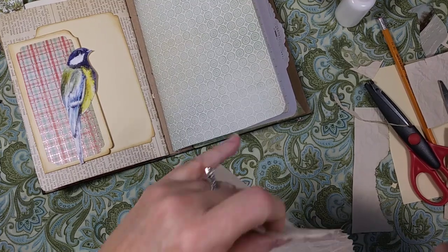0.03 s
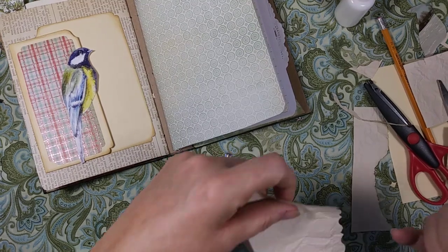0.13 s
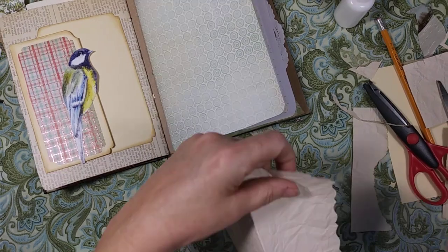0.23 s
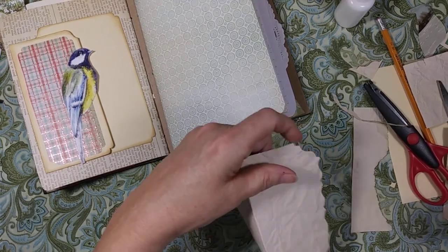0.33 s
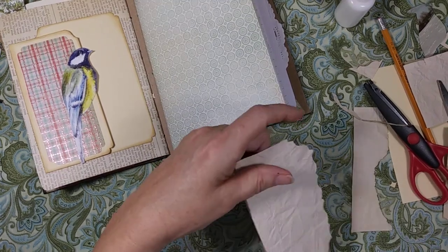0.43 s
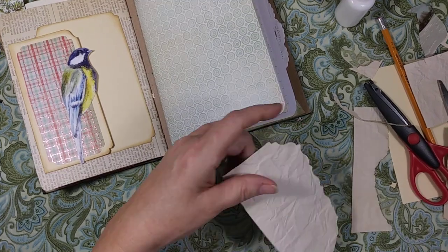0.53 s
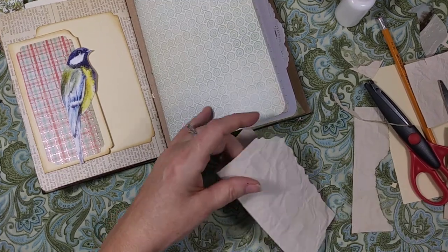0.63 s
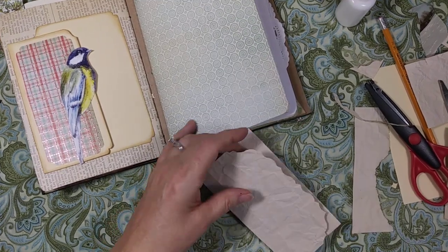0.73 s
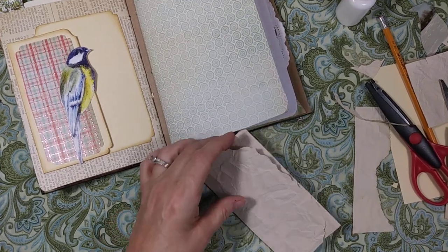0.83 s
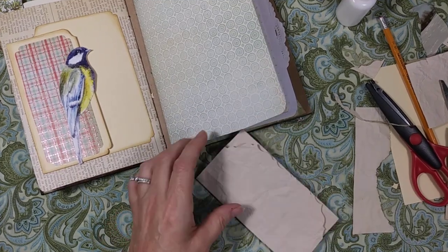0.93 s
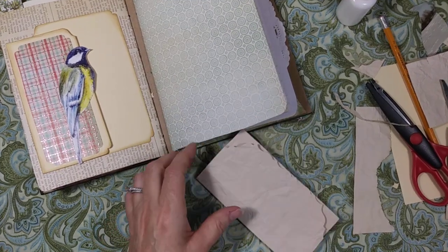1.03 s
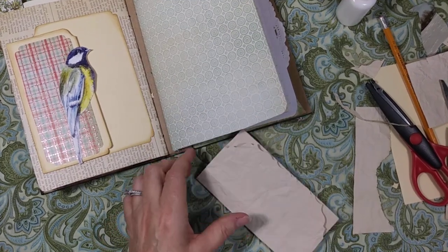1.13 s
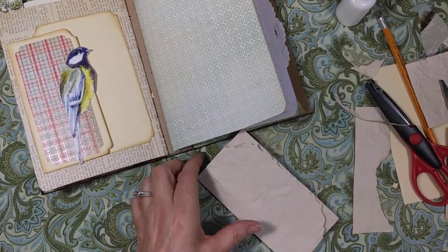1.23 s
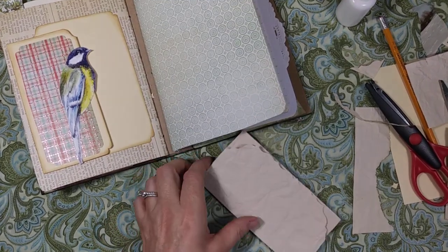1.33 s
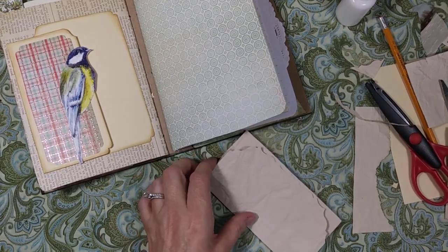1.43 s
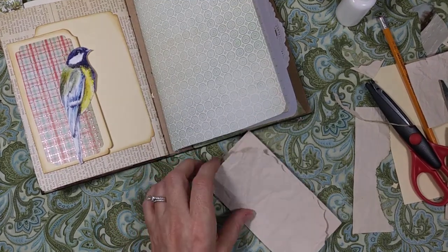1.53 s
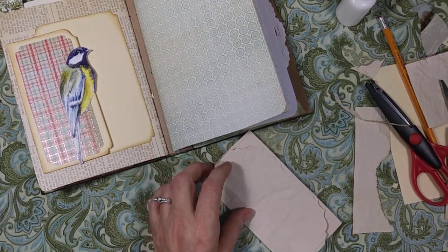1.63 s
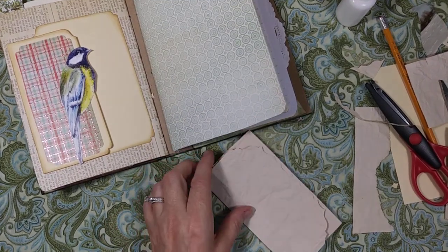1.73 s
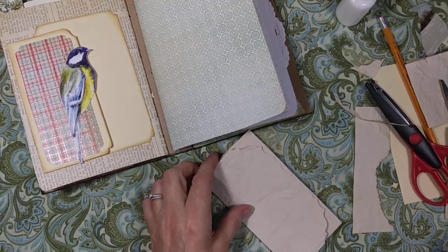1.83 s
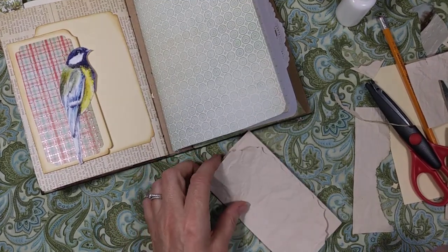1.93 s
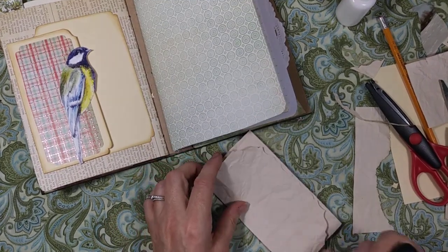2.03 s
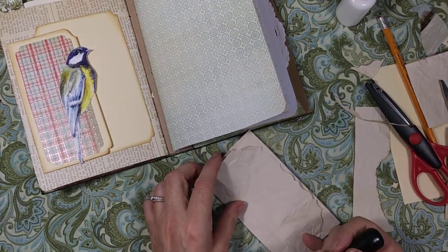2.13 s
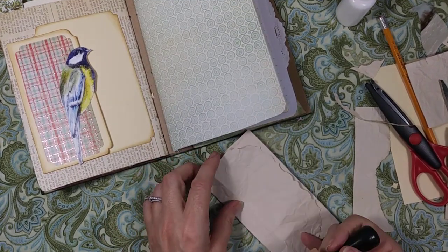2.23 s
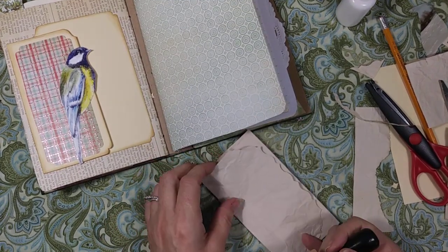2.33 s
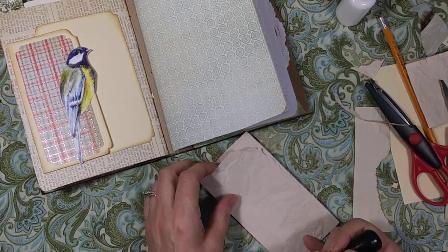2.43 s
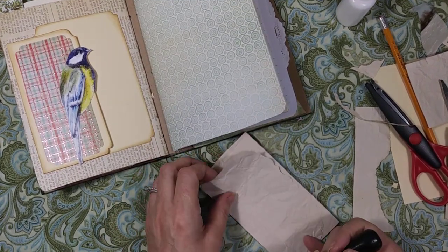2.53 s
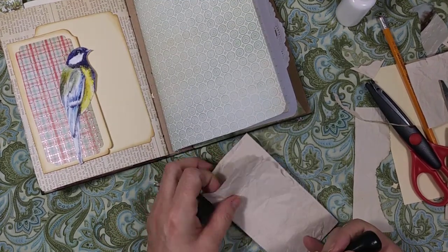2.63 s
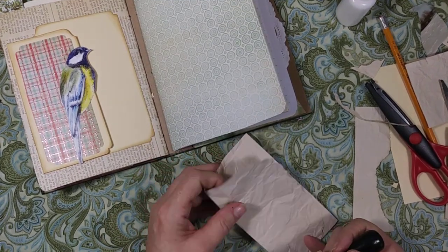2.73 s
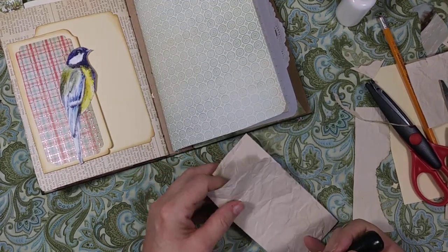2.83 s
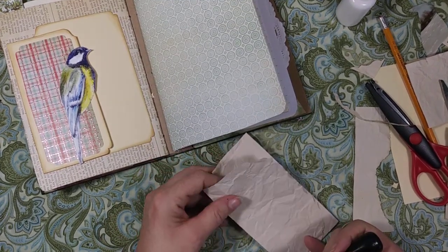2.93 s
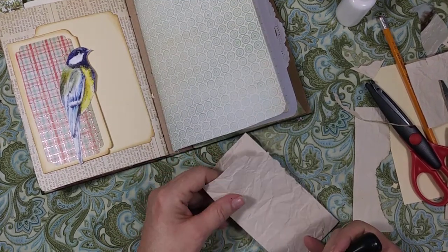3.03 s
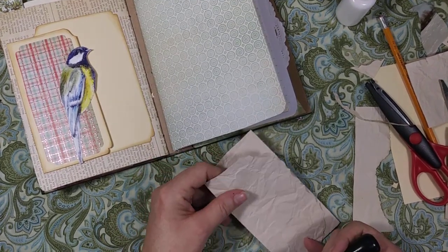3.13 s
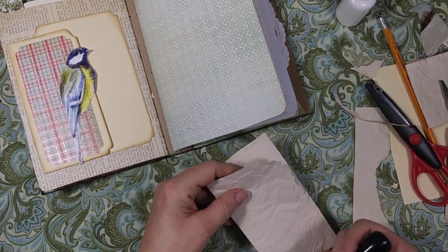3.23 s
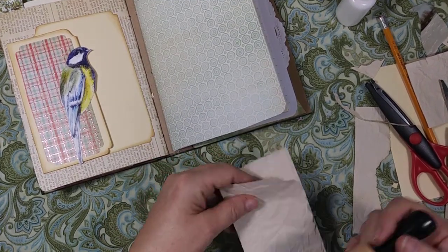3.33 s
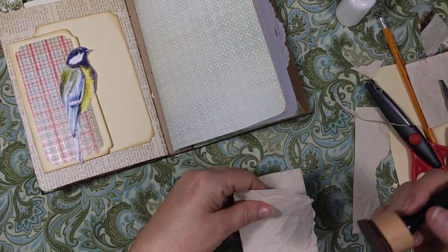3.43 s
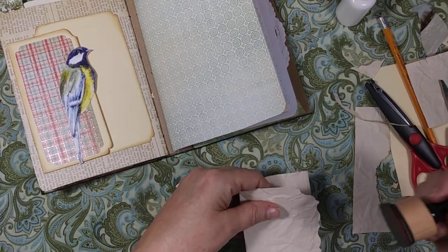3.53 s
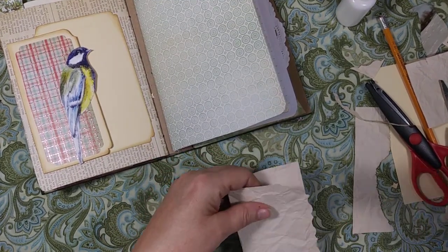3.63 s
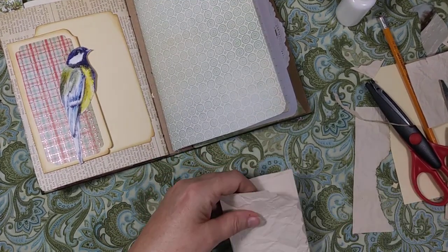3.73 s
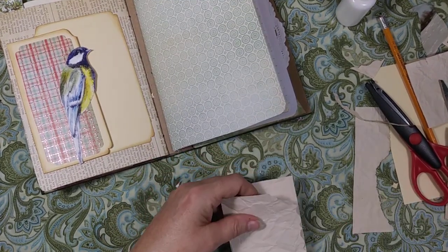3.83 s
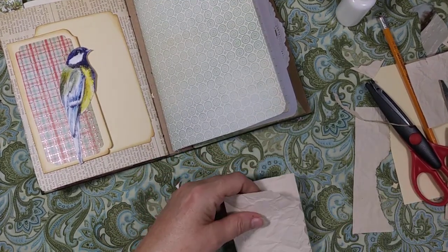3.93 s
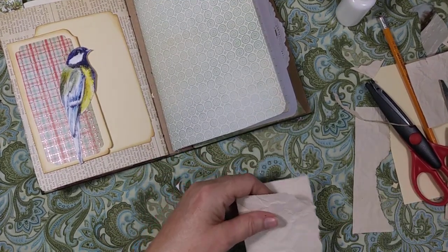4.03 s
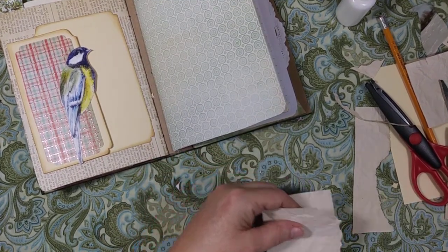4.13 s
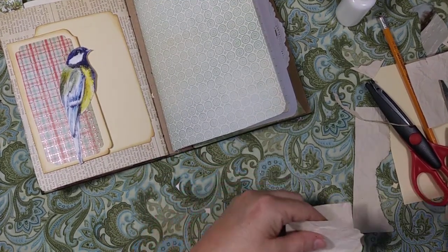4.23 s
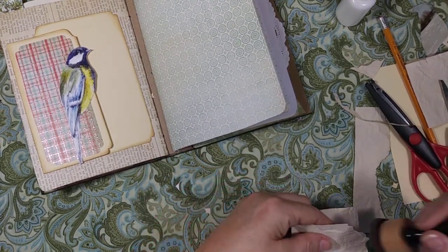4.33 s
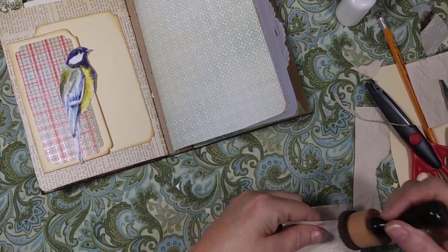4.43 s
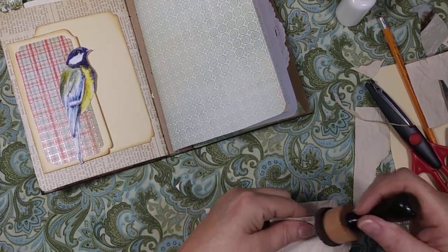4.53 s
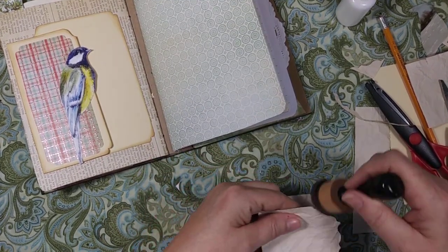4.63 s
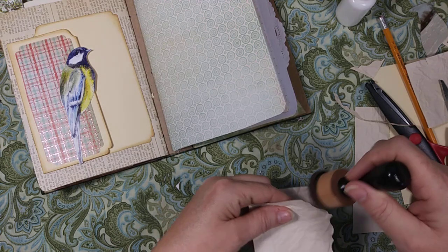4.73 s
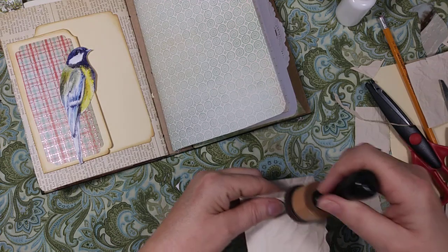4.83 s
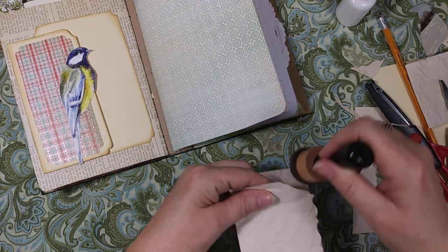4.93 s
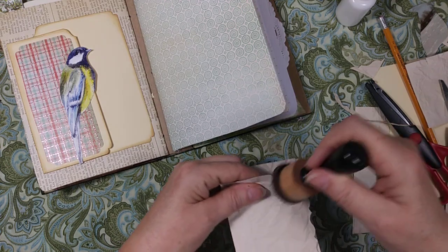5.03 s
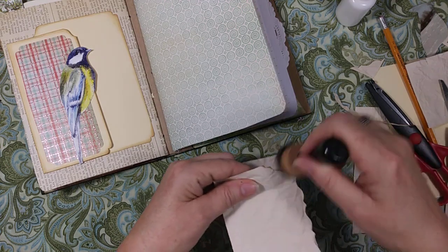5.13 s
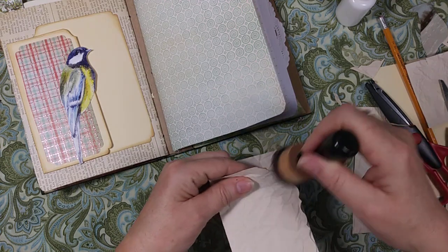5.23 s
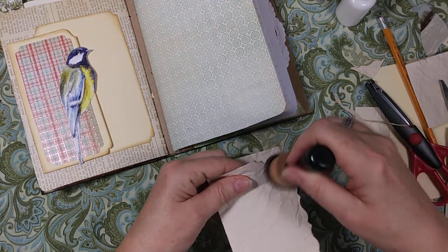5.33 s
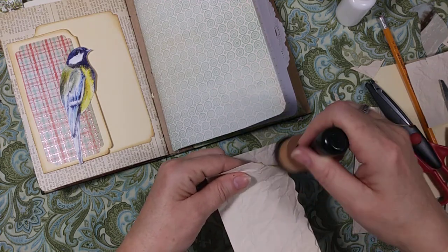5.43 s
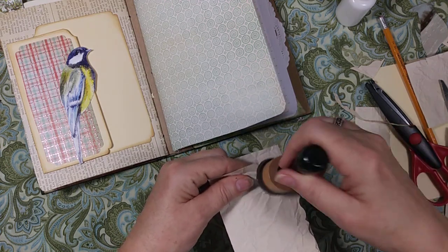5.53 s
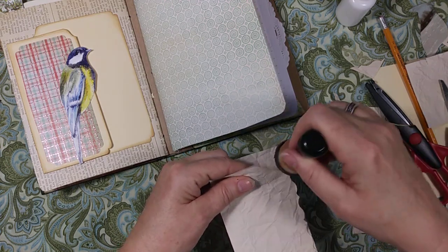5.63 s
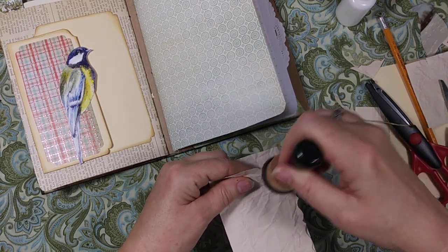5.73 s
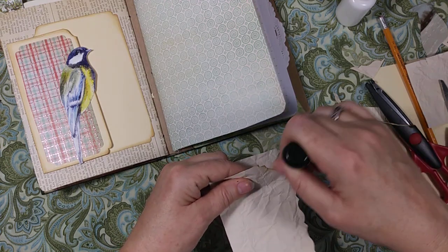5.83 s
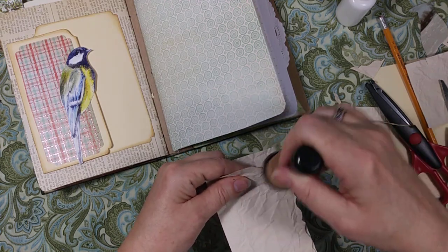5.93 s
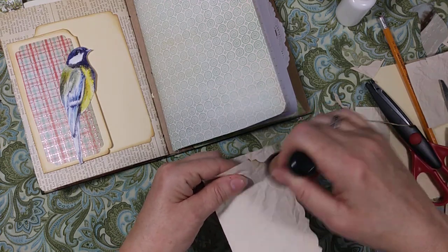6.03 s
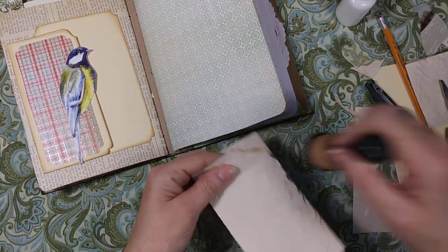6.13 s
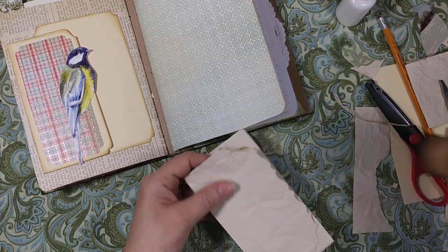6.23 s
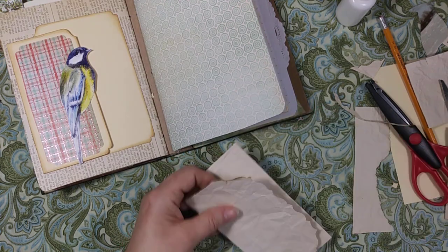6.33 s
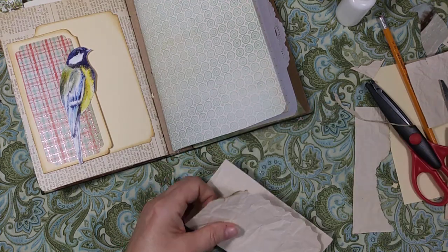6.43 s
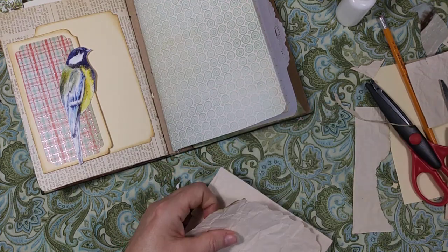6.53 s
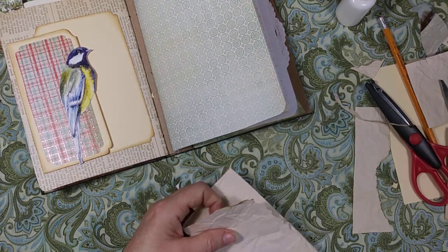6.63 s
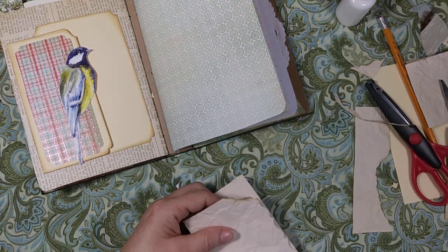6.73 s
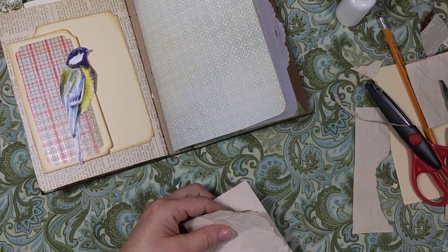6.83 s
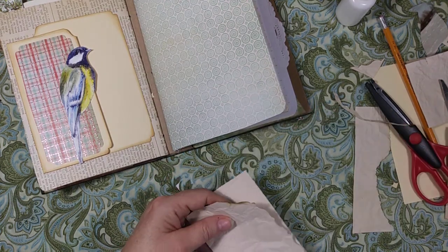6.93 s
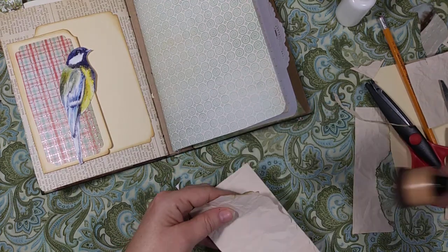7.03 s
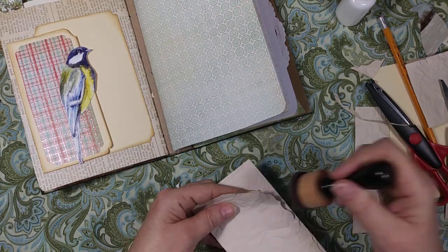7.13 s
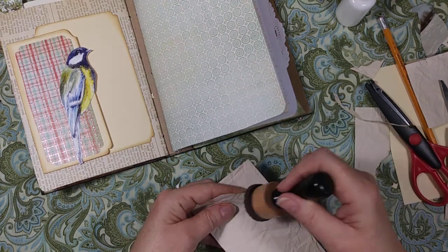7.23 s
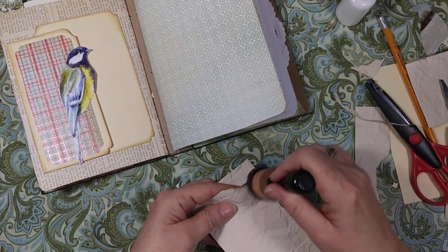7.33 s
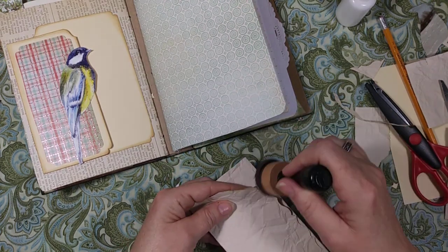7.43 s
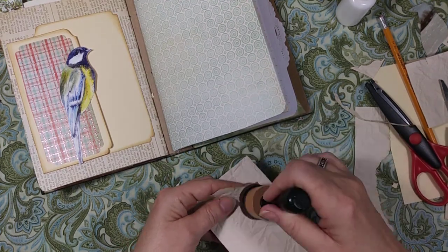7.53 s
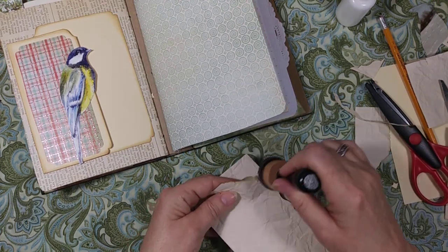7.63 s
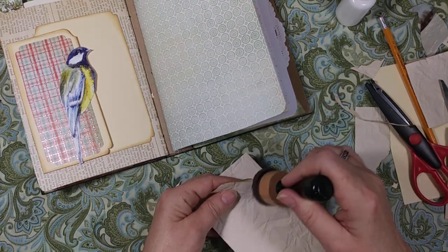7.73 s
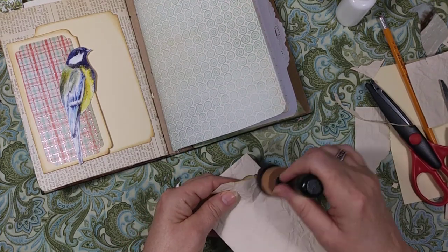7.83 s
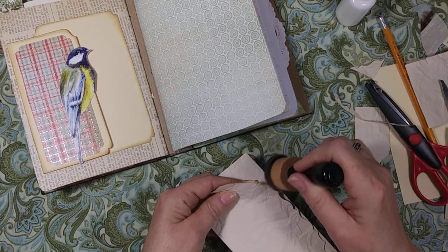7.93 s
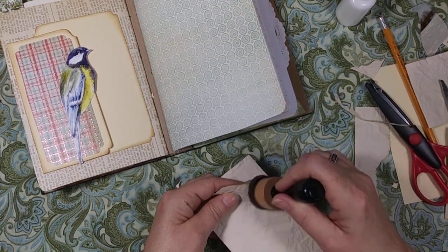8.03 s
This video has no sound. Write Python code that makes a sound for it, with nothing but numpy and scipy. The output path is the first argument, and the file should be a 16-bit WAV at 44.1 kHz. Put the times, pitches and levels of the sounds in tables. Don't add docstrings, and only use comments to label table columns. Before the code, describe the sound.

Crumpled paper rustles and crackles on a cloth-covered table, then a foam dauber scuffs its edge in short dry strokes ending in papery snaps.

```python
import sys
import numpy as np
from scipy import signal
from scipy.io import wavfile
from scipy.ndimage import uniform_filter1d

SR = 44100
rng = np.random.default_rng(int(sys.argv[2]) if len(sys.argv) > 2 else 0)


def store_wav(level_fs):
    pcm = np.round(np.clip(np.atleast_2d(level_fs), -1, 1) * 32767)
    wavfile.write(sys.argv[1], SR, pcm.T.astype(np.int16))


def volts(x):
    e = np.asarray(x, float) / 20
    return 10 ** e


N = 356769
STEP = 32

# [hz, level_db per Hz]
FIBRE_HISS = [(880, -44), (1500, -25), (2340, -16.5), (3600, 5.5), (5490, 1), (10000, -6), (11800, -24.5),
              (16000, -12)]
# [hz, width_hz, level_db]
SHEET_MODES = [(570, 130, -6), (737, 73, 1.5), (1123, 115, 5.5), (1350, 630, -7.5), (1730, 58, 5),
               (2380, 680, 0.5)]
# [hz, width_hz, level_db]
CRACK_MODES = [(2630, 280, -0.5), (3100, 120, -4), (3850, 88, -5.5), (4440, 500, -1.5), (5746, 300, 9.5),
               (5860, 330, 7.5), (6620, 430, 0)]
# [hz, width_hz, level_db]
HAND_MODES = [(300, 110, -2), (500, 110, 0), (710, 120, -6)]
HELD_SHEET_DB = -4.5
LOOSE_DULLS, SHEEN_HZ = 0.53, 6000


def rubbing():
    hiss_db, body_db, flap_hz, loose_db, dabbing = friction()
    fibres = grains(per_s=9500, spread_db=3.0, clump_db=2.32)
    crinkles = grains(per_s=210, spread_db=3.0, clump_db=2.5)
    catches = rms_one(fibres) + volts(-11.5) * rms_one(crinkles)

    hiss = coloured(catches, FIBRE_HISS, patchy_db=1.3, rate=18)
    crackle = modes(catches[1], CRACK_MODES, [drift(16) for mode in CRACK_MODES], scatter_db=4.5)
    hiss = hiss + volts(-7) * rms_one(crackle)
    soft = signal.lfilter(*signal.butter(1, SHEEN_HZ, fs=SR), hiss)
    hiss = soft + volts(-LOOSE_DULLS * np.maximum(loose_db, 0)) * (hiss - soft)
    hiss = dull(hiss, cut_hz=12700)

    sheet = modes(catches[0], SHEET_MODES, [drift(20.3) for mode in SHEET_MODES], scatter_db=4.5)
    body = rms_one(sheet) + 1.2 * rms_one(flap(catches[1], flap_hz, width_share=.2))
    boom = modes(catches[1], HAND_MODES[1:], [drift(16), drift(13)], scatter_db=3.5)
    body = body + volts(HELD_SHEET_DB) * dabbing * rms_one(boom)
    body = rms_one(dull(body, cut_hz=2950))
    return volts(hiss_db - 1.0) * (hiss + volts(np.minimum(body_db, 6) - 3.5) * body)


# [pressure_end_s, hiss_db, swell_s, held_s, fade_s]
DAUBER_STROKES = [
    (4.72, -43.5, 0.038, 0.033, 0.027),
    (4.989, -47, .04, .04, 0.041),
    (5.216, -45, 0.052, 0.022, 0.068),
    (5.456, -47, 0.047, 0.047, 0.059),
    (5.665, -49.5, 0.037, 0.037, .11),
    (5.915, -53.5, .025, 0.054, 0.081),
    (6.144, -53, 0.11, 0.022, 0.046),
    (7.433, -49, 0.043, 0.038, 0.044),
    (7.715, -47.5, 0.11, 0.046, 0.032),
    (7.93, -44.5, 0.057, 0.013, 0.054),
]
# [peak_s, hiss_db, swell_s, fade_s]
SHEET_SHIFTS = [(0.0, -50.5, .1, 0.24), (0.172, -46.5, 0.067, 0.087), (0.355, -43.5, 0.067, .13),
                (0.479, -53.5, 0.057, 0.45), (0.659, -55, 0.058, 0.39), (0.8, -52, .3, .06),
                (0.852, -40.5, .016, 0.023), (0.938, -50.5, 0.097, .17), (1.6, -52, 0.062, .05),
                (1.634, -37.5, 0.05, 0.025), (1.766, -51, 0.099, 0.082), (1.97, -53, 0.049, 0.037),
                (2.047, -56, 0.035, 0.13), (2.207, -47.5, 0.068, 0.086), (2.299, -44, 0.08, 0.031),
                (2.464, -43.5, .12, 0.024), (2.714, -44.5, 0.21, 0.047), (2.808, -44.5, 0.049, 0.21),
                (2.893, -45.5, 0.17, 0.029), (3.052, -50.5, .02, 0.64), (3.267, -42, 0.11, 0.08),
                (3.368, -53.5, 0.13, 0.42), (3.79, -51, .3, 0.22), (4.198, -51, 0.32, 0.26),
                (4.446, -53, 0.089, 0.13), (6.254, -42, 0.057, 0.065), (6.441, -49, .2, 0.33),
                (6.77, -46.5, 0.26, 0.26), (6.934, -45, 0.063, 0.19), (7.192, -52, .12, 0.096)]
# [time_s, hiss_db, flap_pitch_hz, looseness_db added to the body]
STEADY_CONTACT = [(0.0, -59, 1930, -0.2), (0.4, -66.5, 1300, 1.6), (0.7, -55.5, 2200, -0.8),
                  (1.0, -63, 1700, 0.5), (1.09, -75, 1300, -0.5), (1.36, -67, 1500, 0),
                  (1.45, -56, 2300, 0.5), (2.0, -72, 2300, 2), (2.4, -68, 2250, 3.5),
                  (2.95, -66.5, 1310, -1.1), (3.5, -58, 1460, -4), (3.95, -63, 2060, 2.5),
                  (4.5, -72, 1400, 0.2), (6.15, -70, 1290, -0.2), (6.45, -63.5, 2050, -2.5),
                  (6.8, -53.5, 1760, -1.5), (7.3, -64.5, 1570, -0.5), (8.09, -69.5, 1300, -1.5)]
# [from_s, to_s]
DABBING_SPANS = [
    (4.55, 6.2),
    (7.3, 8.1),
]
BODY_DB, DABBING_BODY_DB = 0.18, 4
BODY_LAGS, MID_RUB_DB = 0.28, -55


def friction():
    contact_db, flap_hz, loose_db = in_time(STEADY_CONTACT)
    power = sum(swell(s, db, swell_s, 0, fade_s) for s, db, swell_s, fade_s in SHEET_SHIFTS)
    power = power + sum(swell(*stroke) for stroke in DAUBER_STROKES)
    hiss_db = 10 * np.log10(volts(2 * contact_db) + smooth(power))
    t = np.arange(N) / SR
    dabbing = sum((t > start) & (t < end) for start, end in DABBING_SPANS)
    body_db = BODY_DB + loose_db + DABBING_BODY_DB * dabbing - BODY_LAGS * (hiss_db - MID_RUB_DB)
    return hiss_db, body_db, flap_hz, loose_db, dabbing


def swell(s, db, swell_s, held_s, fade_s):
    t = steps() - s
    before = np.maximum(-t - held_s, 0) / max(swell_s, .005)
    after = np.maximum(t, 0) / max(fade_s, .005)
    return volts(2 * (db - 20 * np.minimum(before + after, 4)))


def grains(per_s, spread_db, clump_db):
    sizes = volts(spread_db * np.minimum(rng.exponential(1, (2, N)), 5)) * rng.choice([-1, 1], (2, N))
    born = rng.random((2, N)) < per_s / SR
    return sizes * born * volts(clump_db * drift(28.4))


def flap(x, hz, width_share):
    out, state = np.zeros(N), np.zeros(2)
    for i in range(0, N, 256):
        r = np.exp(-np.pi * width_share * hz[i] / SR)
        poles = [1, -2 * r * np.cos(2 * np.pi * hz[i] / SR), r * r]
        out[i:i + 256], state = signal.lfilter([1 - r, 0, r - 1], poles, x[i:i + 256], zi=state)
    return out


# [hz, width_hz, level_db]
TABLE_MODES = [(420, 160, -14), (670, 70, 0)]
HAND_HZ, LIFTED_S, VOLLEY_T60_S = 500, 3.5, 0.031


def snaps():
    out, t = np.zeros(N + 2048), np.arange(2048) / SR
    for s, body_db, hz, crack_db, crack_hz, thud_db, thud_hz in snap_rows():
        luck = rng.standard_normal((5, len(t)))
        volley = luck[:2] ** 3 * [[.07], [.12]] * volts(-60 * t / VOLLEY_T60_S)
        volley[:, 0] += 4.0

        bend = dull(volley[0], cut_hz=1.12 * hz)
        body = resonance(bend, hz, 0.24 * hz)
        body = body + volts(-11.5) * modes(bend, SHEET_MODES, luck[2], scatter_db=2.0)

        tear = dull(dull(volley[1], cut_hz=22000), cut_hz=8000)
        crack = resonance(tear, crack_hz, 0.16 * crack_hz)
        crack = crack + volts(-10) * modes(tear, CRACK_MODES, luck[3], scatter_db=4.0)
        bare_edge = dull(np.diff(tear, prepend=0), cut_hz=9500)
        crack = crack + volts(-16.5) * bare_edge

        lying = s < LIFTED_S
        ratio = thud_hz / HAND_HZ
        support = TABLE_MODES if lying else HAND_MODES * np.array([ratio, ratio, 1])
        thud = modes(dull(volley[0], cut_hz=860), support, luck[4], scatter_db=1.5)
        thud = np.roll(thud, round(0.00196 * SR) * lying)

        at = round((s + 0.00091) * SR)
        for part, db in ((body, body_db + 0.17), (crack, crack_db + 7.5), (thud, thud_db + 3.0)):
            out[at:at + len(t)] += volts(db) * part / np.abs(part).max()
    return out[:N]


# [time_s, body_db, body_pitch_hz, thud_db, thud_pitch_hz]
EDGE_FLICKS = [
    (4.715, -36, 1110, -48, 453),
    (4.985, -25.5, 1260, -39, 503),
    (4.991, -21, 1350, -42, 400),
    (5.219, -27, 1340, -38.5, 433),
    (5.458, -27, 1350, -38, 450),
    (5.706, -27, 1230, -40.5, 525),
    (5.919, -26, 1330, -36.5, 470),
    (6.135, -29.5, 1220, -40.5, 494),
    (7.437, -20, 1490, -51, 600),
    (7.944, -41, 1040, -62, 500),
]
# [time_s, body_db, body_pitch_hz, crack_db]
FOAM_CATCHES = [(4.476, -39, 1070, -61), (4.717, -50, 1120, -39), (4.721, -43, 1350, -55),
                (4.853, -44, 1160, -60), (4.996, -48, 1760, -42), (5.003, -40, 1650, -44),
                (5.235, -40, 1060, -36), (5.382, -38.5, 1650, -64), (5.605, -40, 1820, -48),
                (5.617, -35.5, 1100, -53), (5.856, -32, 1250, -46), (6.075, -37, 1330, -69),
                (6.152, -51, 1350, -44), (7.44, -42, 1740, -42), (7.447, -37, 1670, -65),
                (7.878, -38, 1740, -44), (7.946, -55, 1040, -46)]
# [time_s, body_db, body_pitch_hz, crack_db, crack_pitch_hz]
CREASE_SNAPS = [(0.342, -35, 2200, -56, 5190), (0.412, -41, 1160, -44, 3750),
                (0.485, -27.5, 1120, -38.5, 3100), (0.651, -37.5, 2450, -41.5, 4140),
                (0.847, -41, 1480, -29, 4700), (0.852, -45, 1550, -36, 4800),
                (0.927, -36.5, 1530, -52, 5240), (1.422, -47, 2420, -43, 2610),
                (1.587, -37, 2470, -42, 2960), (1.755, -44, 1910, -41, 6160),
                (1.868, -59, 872, -39.5, 7750), (1.964, -45, 2470, -46.5, 2920),
                (2.159, -39, 2490, -41, 3920), (2.192, -36, 1350, -46, 2660), (2.201, -36, 2300, -47, 3850),
                (2.302, -37, 2400, -40, 2560), (2.715, -39.5, 1200, -33, 3250),
                (2.774, -24, 2500, -34.5, 5200), (2.801, -26.5, 1130, -28.5, 3280),
                (2.854, -38, 1240, -36, 3450), (2.883, -39, 1730, -38, 6100), (2.89, -37, 886, -36, 4700),
                (3.05, -52, 1530, -40.5, 5450), (3.085, -40, 1920, -44, 5670)]
# [time_s, crack_db, thud_db, thud_pitch_hz]
KNOCKS = [(2.894, -48, -47, 500), (3.277, -41, -53, 500), (3.716, -44.5, -49, 490),
          (4.024, -41.5, -59, 500), (.463, -46, -65, 500), (4.215, -44, -45.5, 292), (5.047, -54, -71, 500),
          (5.286, -56, -65, 500), (5.489, -52, -51, 500), (5.522, -54, -62, 500), (5.989, -56, -60, 500),
          (6.707, -44, -41.5, 293)]
FLICK_CRACK_DB, FLICK_CRACK_HZ = -20, 3630
CATCH_THUD_DB, CATCH_CRACK_HZ = -21, 3640
CREASE_THUD_DB = -14.5
TAP_BODY_DB, TAP_BODY_HZ, TAP_CRACK_HZ = -3, 1190, 4100


def snap_rows():
    flicks = [(s, db, hz, db + FLICK_CRACK_DB, FLICK_CRACK_HZ, *thud) for s, db, hz, *thud in EDGE_FLICKS]
    catches = [(s, db, hz, crack_db, CATCH_CRACK_HZ, db + CATCH_THUD_DB, HAND_HZ)
               for s, db, hz, crack_db in FOAM_CATCHES]
    creases = [(*row, row[1] + CREASE_THUD_DB, HAND_HZ) for row in CREASE_SNAPS]
    taps = [(s, db + TAP_BODY_DB, TAP_BODY_HZ, db, TAP_CRACK_HZ, *thud) for s, db, *thud in KNOCKS]
    return creases + flicks + catches + taps


# [hz, width_hz, level_db]
PAD_CASE = [(570, 45, 3), (1100, 90, -9), (2200, 110, -2), (4500, 250, -5)]


def pad():
    foam = grains(per_s=3000, spread_db=3.0, clump_db=1.5)[0]
    case = modes(foam, PAD_CASE, [drift(11) for mode in PAD_CASE], scatter_db=3.0)
    grind = swell(s=4.16, db=-57, swell_s=0.082, held_s=0.37, fade_s=0.14)
    return rms_one(case) * np.sqrt(smooth(grind))


TABLE_ECHO_S, TABLE_ECHO_DB = .0023, -21
ROOM_T60_S, ROOM_DB = 0.092, -13.5


def room(x):
    t = np.arange(SR // 4) / SR
    tail = rng.standard_normal(len(t)) * volts(-60 * t / ROOM_T60_S) * (t > .004)
    tail *= volts(ROOM_DB) / np.sqrt(np.sum(tail ** 2))
    tail[0] = 1
    tail[round(TABLE_ECHO_S * SR)] = volts(TABLE_ECHO_DB)
    return signal.fftconvolve(x, tail)[:N]


# [hz, level_db per Hz]
AIR_COLOUR = [(18, -34), (30, 3.5), (273, 5), (988, -4.5), (3600, -13), (4530, -28), (8080, -28),
              (16000, -26.5)]
# [hz, width_hz, level_db]
DUCT_MODES = [(99.7, 18, -0.5), (195.4, 27, 2), (275.7, 35, -7.5)]
ROOM_TONE_DB = -58


def room_tone():
    air = coloured(rng.standard_normal((2, N)), AIR_COLOUR, patchy_db=0.76, rate=8.5)
    duct = rms_one(modes(rng.standard_normal(N), DUCT_MODES, np.zeros(len(DUCT_MODES)), scatter_db=0))
    return volts(ROOM_TONE_DB) * (air + volts(-10.0) * duct)


def resonance(x, hz, width_hz):
    r = np.exp(-np.pi * width_hz / SR)
    poles = [1, -2 * r * np.cos(2 * np.pi * hz / SR), r * r]
    return signal.lfilter(np.array([1, 0, -1]) * (1 - r * r) / 2, poles, x)


def modes(x, table, luck, scatter_db):
    return sum((-1) ** k * volts(db + scatter_db * luck[k]) * resonance(x, hz, width_hz)
               for k, (hz, width_hz, db) in enumerate(table))


def dull(x, cut_hz):
    return signal.lfilter(*signal.butter(2, cut_hz, fs=SR), x)


def coloured(sources, spectrum, patchy_db, rate):
    hz, db = np.transpose(spectrum)
    edges, out = 28 * 2 ** (np.arange(29) / 3), 0
    for k, (low, high) in enumerate(zip(edges, edges[1:])):
        band = signal.sosfilt(signal.butter(2, [low, high], "band", fs=SR, output="sos"), sources[k % 2])
        level_db = np.interp(np.log(low * high) / 2, np.log(hz), db)
        out = out + volts(level_db + patchy_db * drift(rate)) * band
    return rms_one(out)


def drift(rate):
    r = np.exp(-40 * np.pi * rate / SR)
    slow = signal.lfilter([1], [1, -2 * r, r * r], rng.standard_normal(N // 20 + 2002))[2000:]
    return np.interp(np.arange(N) / 20, np.arange(len(slow)), rms_one(slow))


def rms_one(x):
    return x / np.sqrt(np.mean(x ** 2) + 1e-20)


def in_time(rows):
    s, *columns = np.transpose(rows)
    return [np.interp(np.arange(N) / SR, s, c) for c in columns]


def steps():
    return np.arange(0, N + STEP, STEP) / SR


def smooth(control):
    return np.interp(np.arange(N) / SR, steps(), control)


def scene():
    mono = room(rubbing() + snaps() + pad()) + room_tone()
    return np.array([mono, mono])


# [shut_s, depth_db, held_s]
GATE_SHUTS = [(1.115, -17, 0.018), (1.177, -19.5, .002), (1.203, -18.5, .002), (1.239, -22.5, .002),
              (1.275, -11, .02), (1.31, -22, .002), (1.35, -19, 0.022), (1.866, -8, 0.02),
              (1.918, -9.5, 0.012), (2.023, -11.5, 0.016), (2.107, -11, 0.0055), (2.153, -20.5, .002),
              (4.388, -14.5, .002), (4.58, -25, .018), (4.643, -24, .002), (4.807, -20.5, 0.0022),
              (4.847, -13.5, .002), (4.9, -11, 0.016), (5.08, -8.5, 0.045), (5.328, -14, 0.02),
              (5.543, -9.5, .005), (5.775, -17.5, 0.052), (6.033, -21.5, 0.019), (7.274, -19.5, 0.046),
              (7.35, -8, 0.026), (7.516, -16, 0.013), (7.564, -25, .002), (7.801, -24.5, 0.013),
              (7.849, -19.5, .002), (8.043, -17, .05)]
SHUT_DB_PER_S, OPEN_DB_PER_S, OPEN_DB = 696, 695, 0


def gate_db():
    t = steps()
    dips = [depth_db + SHUT_DB_PER_S * np.maximum(s - t, 0) + OPEN_DB_PER_S * np.maximum(t - s - held_s, 0)
            for s, depth_db, held_s in GATE_SHUTS]
    return smooth(np.minimum(np.min(dips, axis=0), OPEN_DB))


def band_limit(x):
    return signal.sosfilt(signal.butter(12, 16420, fs=SR, output="sos"), x)


LOW_CUT_HZ, TOP_HZ = 62, 15830
CIRCUIT_HISS_DB, CIRCUIT_TOP_HZ = -86.5, 12600
TOP_SHUTS_DB = -8


def record(dry):
    band = signal.sosfilt(signal.butter(4, LOW_CUT_HZ, "high", fs=SR, output="sos"), dry)
    circuit = signal.butter(8, CIRCUIT_TOP_HZ, fs=SR, output="sos")
    hiss = signal.sosfilt(circuit, rng.standard_normal(N))
    gain_db = gate_db()
    low = signal.sosfiltfilt(circuit, band)
    top_open = uniform_filter1d(1.0 * (gain_db > TOP_SHUTS_DB), size=256)
    gated = (low + top_open * (band - low)) * volts(gain_db) + volts(CIRCUIT_HISS_DB) * hiss
    mix = signal.sosfilt(signal.ellip(10, .5, 60, TOP_HZ, fs=SR, output="sos"), gated)
    return band_limit(mix)


dry = scene()
out = record(dry)
store_wav(out)
```